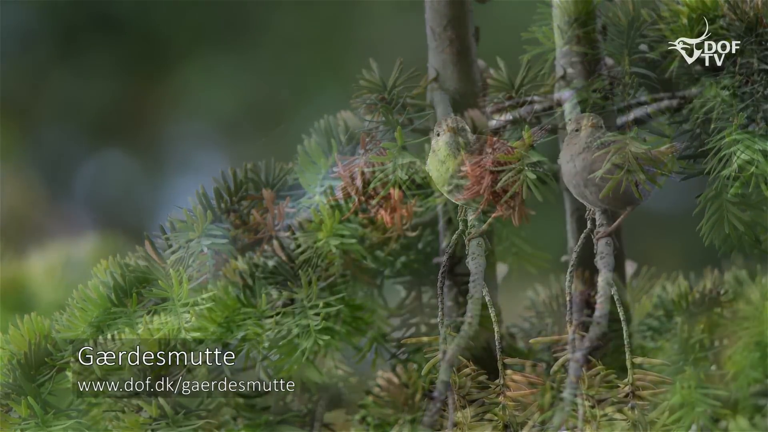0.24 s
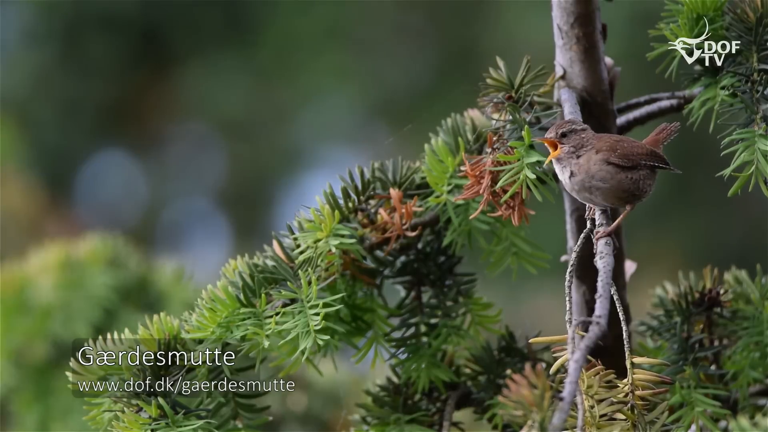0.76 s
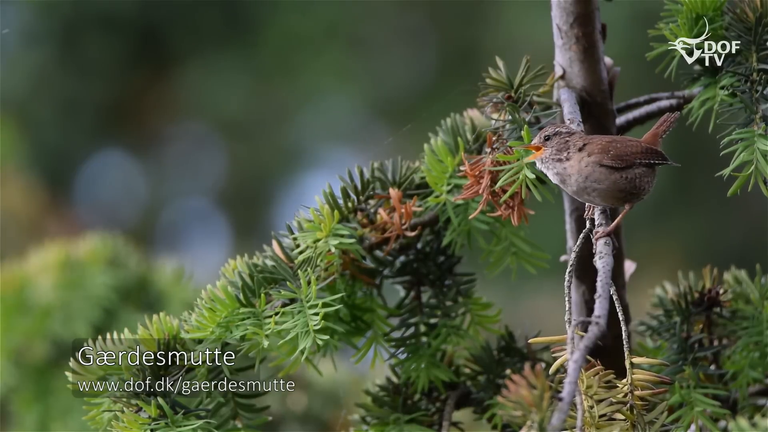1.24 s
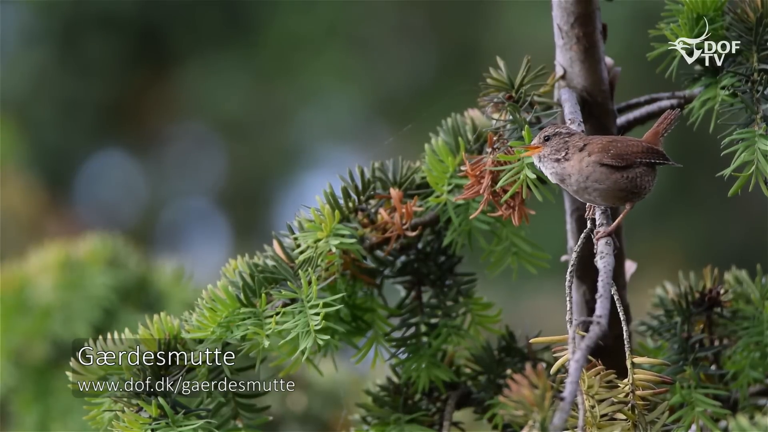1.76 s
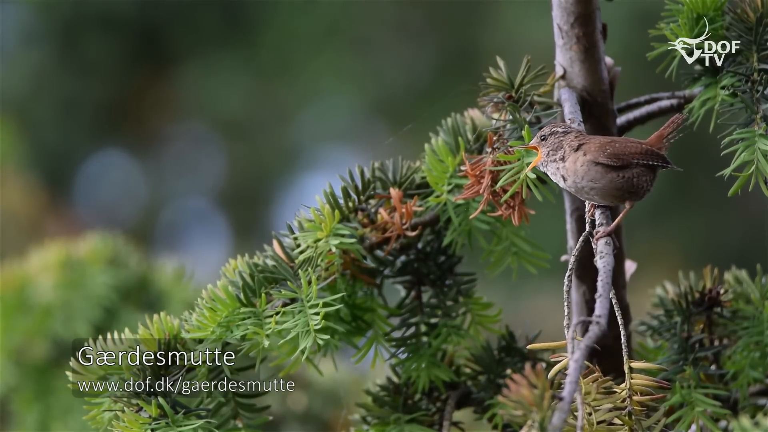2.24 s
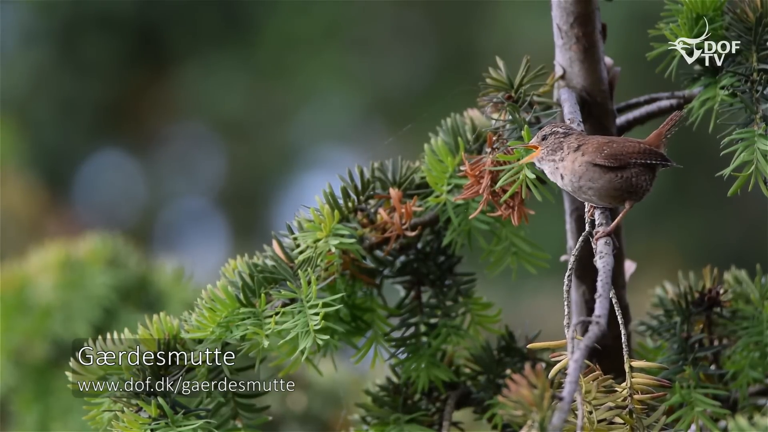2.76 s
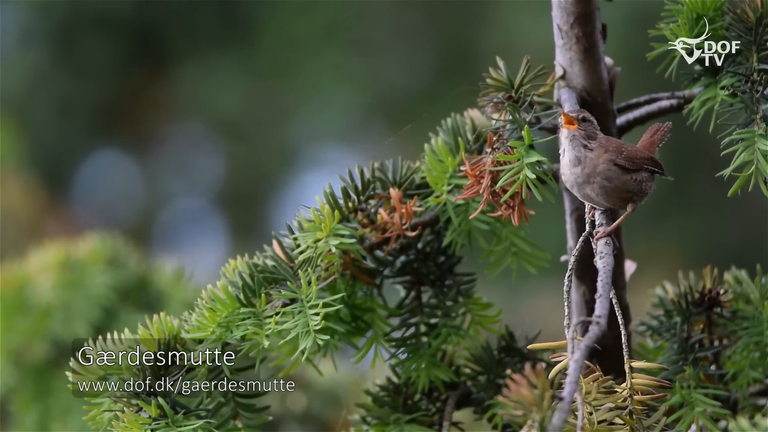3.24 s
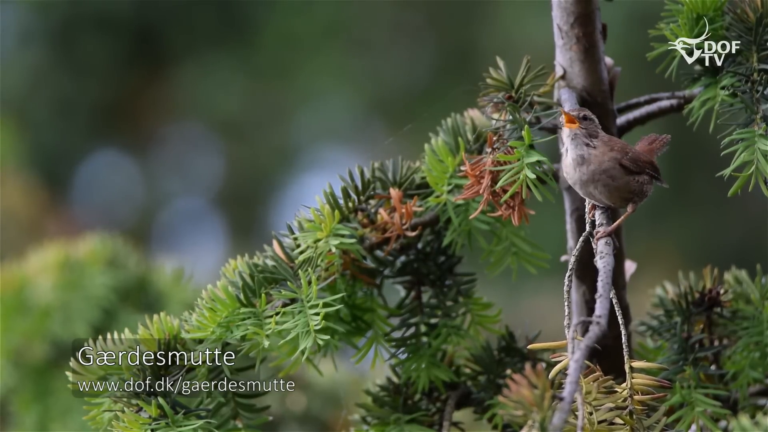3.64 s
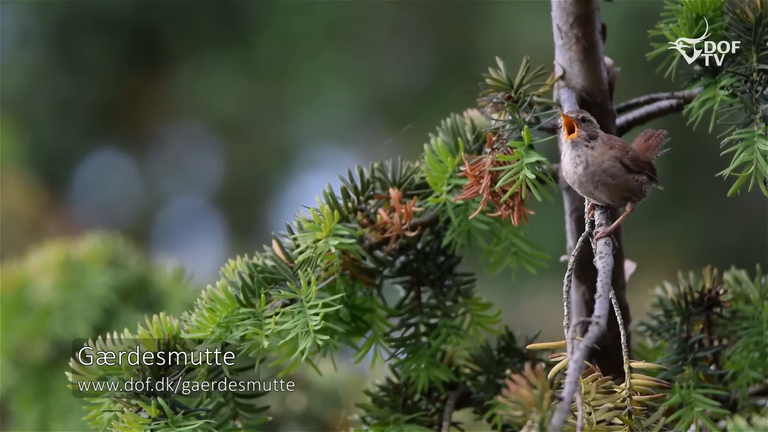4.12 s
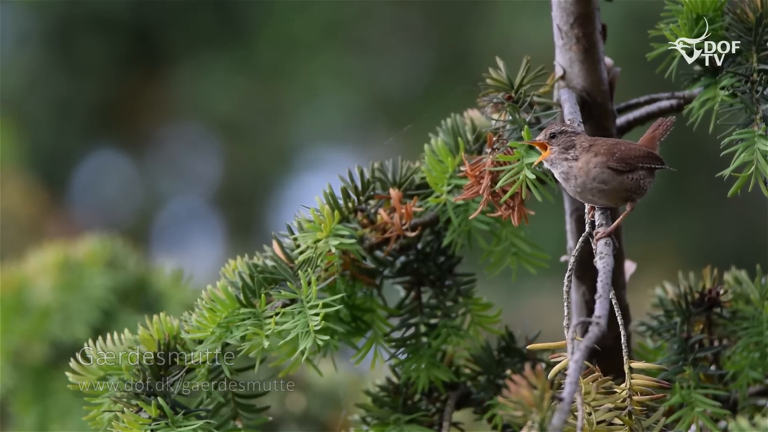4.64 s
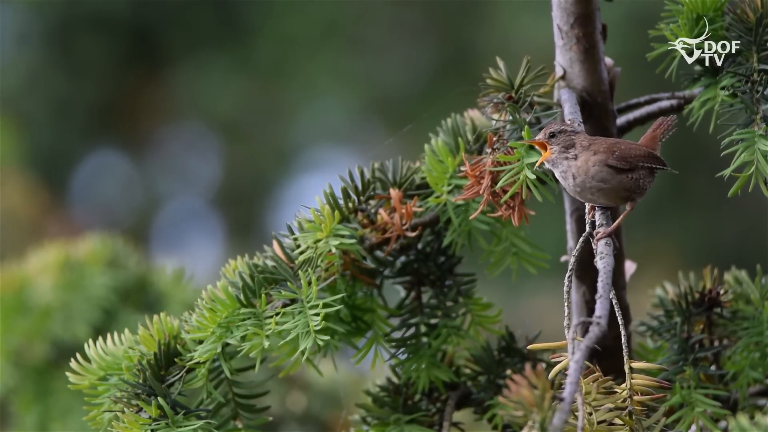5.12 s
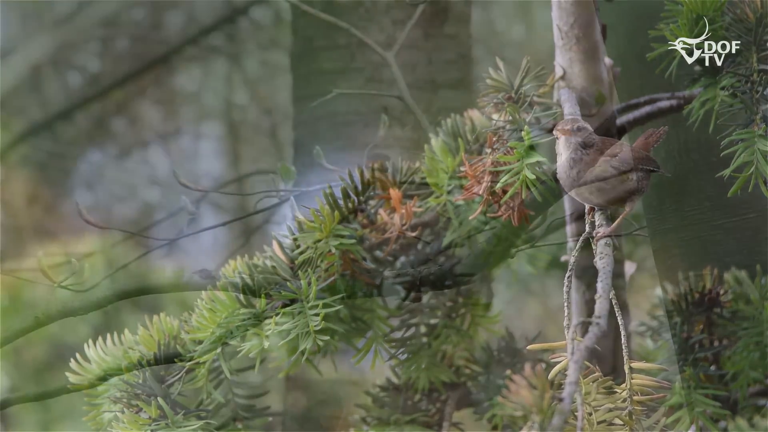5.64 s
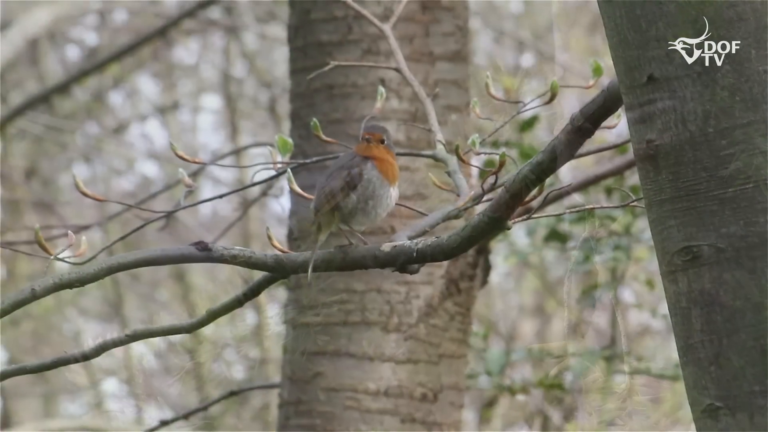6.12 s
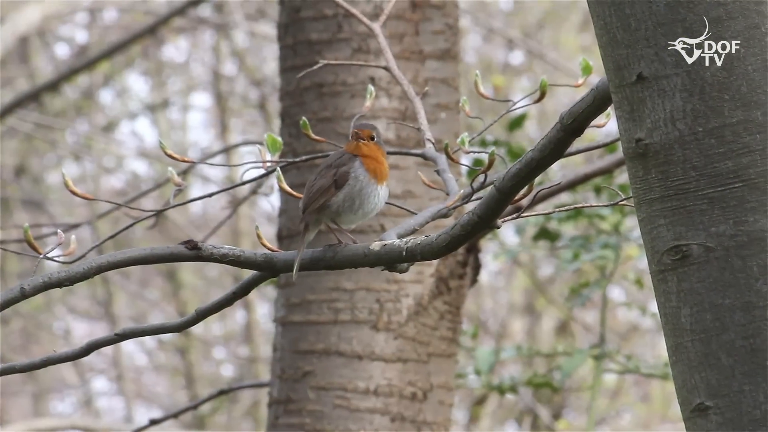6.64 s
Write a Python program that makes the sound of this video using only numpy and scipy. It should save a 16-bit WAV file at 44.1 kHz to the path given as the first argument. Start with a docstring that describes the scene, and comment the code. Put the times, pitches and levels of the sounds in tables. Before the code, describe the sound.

Sharp, echoing wren trills ring out among conifers above steady distant hiss; a crossfade brings low rumble, dry twig-like snaps and piercing robin whistles.

```python
"""Wren song, then a wood with a robin

A wren sings a loud phrase from a conifer over far traffic hiss; its whistles, slides and trills echo off the
trees. The place cross-fades to a wood where a near robin whistles with two voices at once and overloads the
recorder, among twig-like snaps, a low rumble, a bright treble hiss and a thin high whine. A faint note fades
out at the start, and faint birds call far off. Birds are gliding sines, snaps are short rings with noise, and
the backgrounds are coloured noise."""
import sys
import numpy as np
from scipy import signal
from scipy.fft import rfft, irfft, next_fast_len
from scipy.io import wavfile
from scipy.ndimage import uniform_filter1d, map_coordinates

SR = 44100
rng = np.random.default_rng(int(sys.argv[2]) if len(sys.argv) > 2 else 0)


def int16_out(signal):
    """Quantize to a 16-bit WAV file."""
    q = np.round(np.clip(np.atleast_2d(signal).T, -1, 1) * 32767)
    wavfile.write(sys.argv[1], SR, q.astype(np.int16))


N = 303408  # length in samples

# Every note glides to a turning pitch, then slides to its end; it swells to a peak and fades until it is cut.
# Single wren notes: start_s, length_s, first_hz, turn_hz, last_hz, turn_after_s, swell_s, peak_db, fade_db,
# settle (1 is an even slide, more slows down at the end)
WREN_NOTES = [ (0.424, .026, 4500, 5700, 5730, .020, .018, -32, 10, 1),
              (0.498, .036, 6420, 7200, 6480, .014, .030, -26, 4, 2.2),
              (0.577, .062, 4620, 4480, 4430, .012, .036, -19, 1, 1),
              (0.718, .036, 6030, 5010, 4986, .025, .026, -11, 8, 1),
              (0.815, .275, 5400, 7850, 7040, .022, .050, -13, 1.5, 1.2),
              (1.118, .021, 4880, 4750, 3980, .003, .008, -12, 7, 1.5),
              (1.175, .024, 3400, 3530, 3590, .012, .012, -20, 1, 1),
              (1.248, .074, 5300, 5260, 4570, .010, .012, -6, 4, 1.2),
              (1.408, .120, 5030, 4910, 4850, .030, .012, -9, 8, 1),
              (1.540, .057, 3570, 3770, 3430, .028, .046, -16, 0, .7),
              (1.642, .040, 5570, 5300, 3150, .004, .007, -9, 11, 1.6),
              (1.727, .088, 7150, 7350, 4670, .015, .012, -7.5, 7, 1.8),
              (1.848, .023, 3110, 3350, 3210, .008, .008, -27, 0, 1),
              (2.657, .027, 3640, 3820, 3550, .008, .022, -15, 6, 1),
              (2.730, .099, 4670, 4460, 4060, .020, .034, -4.5, 10, .8),
              (2.868, .048, 6730, 8330, 7150, .024, .010, -8, -3, 1.1),
              (3.448, .056, 6170, 6050, 5740, .008, .016, -5.5, 1.5, 1.5),
              (3.502, .106, 5740, 5730, 5680, .010, .004, -14.5, 1.5, 1),
              (3.632, .095, 4880, 4780, 3970, .014, .054, -5.5, 3, .9),
              (4.181, .053, 6560, 7380, 6280, .016, .010, -4, 5, 1.3),
              (4.268, .036, 3194, 3400, 3420, .026, .028, -15, 6, 1),
              (4.356, .195, 8850, 8200, 8070, .022, .012, -8, 1.5, 1.5),
              (4.602, .083, 5400, 5330, 4600, .014, .020, -6, 6, .85), ]
# When each trill syllable is sung: start_s, peak_db
SLUR_TIMES = [(1.913, -8.5), (2.0441, -9), (2.17, -11.5), (2.298, -11.5), (2.42, -9.5), (2.5452, -12.5)]
RISE_TIMES = [(2.963, -4.5), (3.060, -5.5), (3.153, -4.5), (3.246, -5.5), (3.342, -5)]  # its peak_db is for the crest that ends the rise
FALL_TIMES = [(4.745, -7.5), (4.8656, -7.5), (4.98, -8), (5.0984, -7.5), (5.2109, -8.5), (5.3259, -8.5),
              (5.4403, -8.5), (5.5559, -8)]
# Shape of one trill syllable: length_s, first_hz, turn_hz, last_hz, turn_after_s, swell_s, fade_db, settle
SLUR = (.077, 6330, 6420, 6070, .014, .006, 2, 1.6)
FLICK = (.009, 3710, 5300, 5630, .007, .005, 7, 1)
RISE = (.042, 3230, 3400, 3850, .014, .020, -2, 1)
CREST = (.021, 3840, 3880, 4170, .003, .007, 6, 1.1)
FALL = (.054, 6100, 5080, 4780, .034, .005, 0, .8)
TICK = (.006, 7820, 7300, 4560, .001, .001, 0, 1)
PIP = (.008, 5790, 5840, 5750, .004, .002, 5, 1)
# Robin whistles, one row for each voice of each note: columns as for the wren, without settle (even slides)
ROBIN_WHISTLES = [ (6.466, .058, 4820, 6480, 6480, .034, .044, -20, 0),
                  (6.520, .027, 6450, 6400, 6230, .008, .012, -5.5, 11),
                  (6.550, .021, 6350, 6320, 6080, .005, .006, -7, 4),
                  (6.572, .016, 6350, 6300, 6100, .003, .005, -7, 10),
                  (6.615, .127, 5400, 6850, 6800, .024, .100, -1, 0),
                  (6.630, .078, 6510, 6340, 6150, .030, .030, -14, -2),
                  (6.703, .048, 5950, 6080, 5930, .012, .024, -3, 6),
                  (6.806, .100, 6160, 6850, 6760, .016, .060, -2, 0),
                  (6.808, .100, 6250, 6080, 5760, .020, .020, -9, -4), ]
# The robin's low, reedy second voice: columns as for its whistles
ROBIN_REED = [(6.476, .058, 3680, 3830, 3760, .024, .018, -21, 4)]
# Faint notes: columns as for the robin. The first fades out as the scene opens; the rest are birds far off.
FAINT_NOTES = [ (0.0, .14, 5460, 5030, 5200, .06, .005, -45, 8),
               (0.18, .06, 3730, 3650, 3720, .03, .01, -50, 0),
               (0.57, .06, 4100, 3880, 4030, .03, .01, -40, 2),
               (4.43, .13, 5100, 5010, 4820, .06, .02, -45, 0),
               (5.945, .04, 5030, 5150, 5200, .02, .01, -49, 0),
               (6.175, .025, 4220, 3660, 3750, .014, .012, -36, 4),
               (6.22, .03, 3960, 4200, 4000, .012, .006, -39, 1),
               (6.318, .017, 4260, 4270, 4100, .012, .010, -25, 6), ]
# Overtones of each voice: multiple, level_db (the wren's are for a note at 0 dB)
WREN_OVERTONES = [(2, -33.5), (3, -45)]
WHISTLE_OVERTONES = [(2, -34)]
REED_OVERTONES = [(2, -3.5), (3, -12), (4, -27)]
# The wren turns its head: time_s, left_minus_right_db
HEAD_TURNS = [(.4, 1), (1.4, .5), (2, 3), (2.7, 1), (4.2, 2.5), (4.8, -1), (5.55, 0)]
# The loudest dry snaps: start_s, relative_level_db, ring_hz
LOUD_SNAPS = [(1.5222, -15, 2750), (6.2766, -14.5, 3350), (6.3028, -17, 1790), (6.335, -16, 2600),
              (6.3507, -14, 2740), (6.356, -16, 3130), (6.4096, -16, 3900), (6.425, -18.5, 3800),
              (6.4295, -9, 3430), (6.4362, -12, 3500), (6.4582, -16, 2230), (6.4959, -12, 3700),
              (6.6623, -10, 4560), (6.673, -14.5, 3350), (6.6859, -6, 3150), (6.7714, 2.8, 2630),
              (6.7946, -5, 2880), (6.7989, -8, 3300), (6.802, -10, 3020), (6.8067, -1.5, 3550),
              (6.8099, -3, 3660)]
# Tone colour of the snaps: frequency_hz, gain_db
SNAP_COLOUR = [(600, -31.5), (2000, -5), (3500, -1.5), (6000, 0), (10000, -4), (12500, -12), (15000, -25.5),
               (17000, -49)]
# One soft low push: start_s, peak_db, pitch_hz
THUD = (6.2075, -12.5, 315)
# Near echoes off trunks: delay_s, level_db (average of the two sides)
TRUNK_ECHOES = [(.006, -21), (.013, -23), (.022, -29.5), (.027, -22), (.033, -15)]
# How fast the echo cloud dies: frequency_hz, base_time_s to fall by 60 dB
TREE_DECAY = [(3000, 0.27), (5000, .35), (8000, 0.21), (12000, 0.6)]
# Leaves swallow the treble of echoes: frequency_hz, gain_db
LEAF_DULLING = [(3000, 0), (6000, 2), (8300, -1), (10000, -1), (16000, -6.5)]
# Noise colours: frequency_hz, relative_level_db (per Hz)
TRAFFIC_COLOUR = [(70, -55), (120, -23.5), (170, -12.5), (250, -16), (380, -16.5), (520, -7.5), (650, -4.5),
                  (900, -1.5), (1900, -9), (3100, -19), (4500, -25.5), (8000, -38), (12000, -42.5),
                  (14500, -57.5), (17000, -66.5)]
RUMBLE_COLOUR = [(15, -39.5), (30, -22.5), (45, -8), (70, -6.5), (110, -6.5), (160, -11.5), (250, -62.5)]
WOOD_COLOUR = [(30, -31.5), (60, -8.5), (150, -1), (300, -3.5), (600, -9), (1200, -19), (2500, -28.5),
               (4000, -58)]
HISS_COLOUR = [(1000, -36), (2500, -4.5), (5000, 0.5), (8000, -3.5), (10000, -6.5), (12000, -17.5),
               (14500, -19), (17000, -34.5)]
# Stereo width of the noises: frequency_hz, side_minus_mid_db
NOISE_WIDTH = [(60, -24.5), (100, -22.5), (180, -26), (310, -30.5), (520, -28), (900, -21), (1550, -15.5),
               (2670, -11), (4590, -10), (7890, -5)]
# Loudness of each noise over time: time_s, level_db
TRAFFIC_LEVEL = [(0, -26.3), (1.5, -26), (3.5, -28.3), (5, -26.5), (6.1, -26.5), (6.88, -33.5)]
RUMBLE_LEVEL = [(0, -52), (.9, -50), (4, -54), (5, -49.5), (5.8, -51.5), (6.4, -38), (6.88, -35)]
WOOD_LEVEL = [(0, -72.5), (4, -45), (4.7, -41.5), (5.9, -39), (6.4, -32.5), (6.88, -29.5)]
HISS_LEVEL = [(5.7, -76), (6, -48), (6.45, -44.5), (6.6, -42), (6.7, -29), (6.88, -33)]
# The recorder's slow shift away from zero: time_s, value
OFFSET = [(0, -.024), (1, -.0165), (6, -.0165), (6.88, 0)]

ONSET_DB, EASE = -19, 1.8  # a note starts this far under its peak; glide and swell slow down towards their goal
RELEASE_DB, RELEASE_SHARE = 4, .12  # every note dies away over the last part of its length
FLICK_LEAD_S, FLICK_DB = .021, -5  # a flick comes just before each slur, softer
PIP_LEAD_S, PIP_DB = .015, -9  # a pip links each fall to the next
RISE_DB = -11  # a rise is soft until it ends in a loud crest
RATTLE_START_S, TICK_GAP_S, TICK_COUNT, TICK_DB = 3.7595, .02925, 14, -14  # an evenly spaced rattle
SMALL_SNAP_COUNT, SMALL_SNAP_DB, SMALL_SNAP_HZ = 12, -23, 2600  # faint snaps; level and ring scatter around these
FADE_START_S, FADE_END_S = 5.75, 6.88  # the cross-fade from the first place to the wood
WHINE_HZ, WHINE_DB = 15703, -37.5  # this level is reached by the end of the fade
BAND_HZ, TOP_HZ = 15850, 20000  # treble limits before and after the flat cut


def amp(db):
    """Turn decibels into a gain."""
    return 10 ** (np.asarray(db) / 20)


def unit(x):
    """Scale x to an average strength (rms) of 1."""
    return x / np.sqrt(np.mean(x ** 2) + 1e-20)


def along(points, hz):
    """Read a value at each frequency from (Hz, value) points on a log axis."""
    point_hz, values = np.transpose(points)
    return np.interp(np.log(hz + 1), np.log(point_hz + 1), values)


def curve(rows):
    """Join (seconds, value) points into one value per sample."""
    return np.interp(np.arange(N) / SR, *np.transpose(rows))


def wobble(rate, size=N):
    """Make a smooth random curve with this many random points a second."""
    knots = rng.standard_normal(int(size * rate / SR) + 4)
    return map_coordinates(knots, [np.arange(size) * rate / SR])


def filtered(x, response):
    """Shape x with a gain that depends on frequency."""
    padded_size = next_fast_len(N + 8192)
    gain = response(np.fft.rfftfreq(padded_size, 1 / SR))
    return irfft(rfft(x, padded_size) * gain, padded_size)[..., :N]


def rush(colour, patchy_db):
    """Stereo noise of rms 1, with smooth patches of random gain in time and frequency."""
    z = signal.stft(rng.standard_normal((2, N + 512)), nperseg=512)[2]
    patches = uniform_filter1d(rng.standard_normal(z.shape[1:]), 6, 0)
    patches = uniform_filter1d(patches, 14, 1)
    pair = signal.istft(z * amp(patchy_db * unit(patches)), nperseg=512)[1][:, :N]
    # the first channel becomes the middle, the second the difference between the sides
    mid, side = filtered(pair, lambda hz: amp(along(colour, hz) + [0 * hz, along(NOISE_WIDTH, hz)]))
    return unit(np.array([mid + side, mid - side]))


def phrase(start, length, first_hz, turn_hz, last_hz, turn, swell, peak_db, fade_db, settle=1):
    """Turn one note row into points of time (s), pitch (Hz) and level (dB)."""
    t = np.linspace(0, length, num=32)

    def before(goal):
        """Falls from 1 to 0 on the way to the goal, slowing down."""
        return np.clip(1 - t / goal, 0, 1) ** EASE

    def past(goal):
        """Climbs evenly from 0 at the goal to 1 at the end of the note."""
        return np.clip((t - goal) / max(length - goal, 1e-4), 0, 1)

    last_slide = 1 - (1 - past(turn)) ** settle
    hz = turn_hz + (first_hz - turn_hz) * before(turn) + (last_hz - turn_hz) * last_slide
    db = peak_db + ONSET_DB * before(swell) - fade_db * past(swell)
    db = db - RELEASE_DB * past(length * (1 - RELEASE_SHARE))
    return start + t, hz, db


def sing(notes, overtones, waver, flutter_db, edge, effort=0):
    """Each note is a gliding sine with any listed overtones, slightly unsteady, with soft ends of edge seconds."""
    out = np.zeros(N + SR)
    for note in notes:
        s, hz, db = phrase(*note)
        first = round(s[0] * SR)
        t = np.arange(first, round(s[-1] * SR)) / SR
        level_db = np.interp(t, s, db)
        glide = uniform_filter1d(np.interp(t, s, hz), size=65, mode="nearest")  # muscles round the corners
        unsteady_hz = glide * (1 + waver * wobble(150, len(t)))
        phase = 2 * np.pi * np.cumsum(unsteady_hz) / SR
        tone = np.sin(phase)
        for multiple, overtone_db in overtones:
            # with effort above 0, louder notes are richer
            tone = tone + amp(overtone_db + effort * level_db) * np.sin(multiple * phase)
        ends = np.clip(np.minimum(t - s[0], s[-1] - t) / edge, 0, 1)
        loudness = amp(level_db + flutter_db * wobble(120.3, len(t)))
        out[first:first + len(t)] += tone * ends * loudness
    return out[:N]


def echoes(x, cloud_db, side_db, longer, size=16384):
    """Random echoes from the trees, each frequency dying at its own speed; a little differs between the sides.
    The bird keeps moving, so every stretch of sound meets a new cloud."""
    out = np.zeros((2, N + size + 2 * SR))
    fade = np.hanning(size + 1)[:size]  # overlapping stretches blend smoothly
    padded = np.pad(x, (size // 2, size))
    for first in range(0, N + size // 2, size // 2):
        piece = padded[first:first + size] * fade
        if np.abs(piece).max() < 1e-4:  # too quiet to echo
            continue
        hz, t, z = signal.stft(rng.standard_normal((2, SR)), SR, nperseg=256)
        decay_s = longer * along(TREE_DECAY, hz)[:, None]
        tail = signal.istft(z * amp(-60 * t / decay_s), SR, nperseg=256)[1]
        wet = signal.fftconvolve(piece[None], tail / np.linalg.norm(tail[0]), axes=1)
        out[:, first:first + wet.shape[1]] += wet
    mid, side = out[:, size // 2:size // 2 + N]
    side = amp(side_db) * side
    return amp(cloud_db) * np.array([mid + side, mid - side])


def traffic():
    """Far traffic is a broad hiss whose level drifts gently."""
    level = amp(curve(TRAFFIC_LEVEL) + 0.33 * wobble(2.7))
    return level * rush(TRAFFIC_COLOUR, patchy_db=0.54)


def rumble():
    """The rumble is very low noise that swells in the wood."""
    return amp(curve(RUMBLE_LEVEL)) * rush(RUMBLE_COLOUR, patchy_db=1.1)


def wood_roar():
    """The low roar of the wood is dark noise that grows and wavers."""
    level = amp(curve(WOOD_LEVEL) + .6 * wobble(8))
    return level * rush(WOOD_COLOUR, patchy_db=0.4)


def treble_hiss():
    """A bright treble hiss whose fast level changes make short crackling bursts; it flares near 6.7 s."""
    crackle_db = 3 * wobble(200)
    return amp(curve(HISS_LEVEL) + crackle_db) * rush(HISS_COLOUR, patchy_db=2.5)


def electric_whine():
    """The electric whine is one high sine at a steady pitch, rising in level through the cross-fade."""
    fade = curve([(FADE_START_S, 0), (FADE_END_S, 1)])
    return fade ** 1.8 * amp(WHINE_DB) * np.sin(2 * np.pi * WHINE_HZ * np.arange(N) / SR)


def background():
    """Far traffic gives way to the roar, rumble, hiss and whine of the wood."""
    return traffic() + rumble() + wood_roar() + treble_hiss() + electric_whine()


def faint_notes():
    """Faint notes are thin unsteady sines with their echoes."""
    notes = sing(FAINT_NOTES, [], waver=0.0072, flutter_db=-1.0, edge=.004)
    return notes + echoes(notes, cloud_db=-6, side_db=-12, longer=.6)


def trill_notes():
    """Repeat the wren's syllables, each a little off in length, pitch, bend and level."""
    flicks = [(s - FLICK_LEAD_S, db + FLICK_DB) for s, db in SLUR_TIMES]
    pips = [(s - PIP_LEAD_S, db + PIP_DB) for s, db in FALL_TIMES[1:]]
    rises = [(s, db + RISE_DB) for s, db in RISE_TIMES]
    crests = [(s + RISE[0] - .003, db) for s, db in RISE_TIMES]
    ticks = [(RATTLE_START_S + k * TICK_GAP_S, TICK_DB) for k in range(TICK_COUNT)]
    trills = [(SLUR, SLUR_TIMES), (FLICK, flicks), (RISE, rises), (CREST, crests),
              (FALL, FALL_TIMES), (TICK, ticks), (PIP, pips)]
    repeats = []
    for (length, *hz, turn, swell, fade_db, settle), times in trills:
        for s, db in times:
            variation = rng.standard_normal(4) * [.03, .0048, .08, .8]
            longer, higher, later, louder_db = [1, 1, 1, 0] + variation
            repeats.append((s, length * longer, *np.multiply(hz, higher), turn * later,
                            swell * longer, db + louder_db, fade_db, settle))
    return repeats


def trunk_echoes(dull):
    """Near trunks answer with single delayed copies, louder on alternate sides."""
    out = np.zeros((2, N))
    for k, (delay, db) in enumerate(TRUNK_ECHOES):
        delayed = np.pad(dull, (round(delay * SR), 0))[:N]
        lean = amp(2.1 * (-1) ** k * np.array([[1], [-1]]))
        out += amp(db) * delayed * lean
    return out


def wren():
    """The wren's gliding whistles and trills reach us directly, off near trunks and through two echo clouds."""
    notes = list(WREN_NOTES) + trill_notes()
    song = sing(notes, WREN_OVERTONES, waver=0.0018, flutter_db=0.98, edge=0.0019, effort=0.28)
    dull = filtered(song, lambda hz: amp(along(LEAF_DULLING, hz)))
    direct = song * amp(curve(HEAD_TURNS) * [[.5], [-.5]])
    short_cloud = echoes(dull, cloud_db=-3.5, side_db=-9, longer=1.0)
    long_cloud = echoes(dull, cloud_db=-16.5, side_db=-8.5, longer=3.3)
    return direct + trunk_echoes(dull) + short_cloud + long_cloud


def snaps():
    """Each twig-like snap is a few cycles of dying ring and a spit of noise."""
    out = np.zeros(N + SR)
    t = np.arange(SR // 50) / SR
    spread = [FADE_END_S - 6.05, 6.5, SMALL_SNAP_HZ]
    lowest = [6.05, SMALL_SNAP_DB - 3.5, SMALL_SNAP_HZ / 2]
    small = rng.random((SMALL_SNAP_COUNT, 3)) * spread + lowest  # same columns as the loud ones
    for s, db, hz in [*LOUD_SNAPS, *small]:
        ring = amp(-60 * t / 0.0028) * np.sin(2 * np.pi * hz * t)
        spit = 0.9 * amp(-60 * t / 0.0012) * rng.standard_normal(len(t))
        out[round(s * SR):][:len(t)] += amp(db + 5.0) * (ring + spit)
    return filtered(out[:N], lambda hz: amp(along(SNAP_COLOUR, hz)))


def thud():
    """The thud is about one soft low cycle under a bell-shaped swell."""
    s, db, hz = THUD
    cycles = (np.arange(N) / SR - s - .001) * hz
    return -amp(db) * np.cos(2 * np.pi * cycles) * np.exp(-2.5 * cycles ** 2)


def robin():
    """Two voices beat against each other; sharing one windpipe, they also make sum and difference tones."""
    whistle = sing(ROBIN_WHISTLES, WHISTLE_OVERTONES, waver=.006, flutter_db=2.6, edge=.002)
    reed = sing(ROBIN_REED, REED_OVERTONES, waver=.002, flutter_db=3.0, edge=.002)
    whistle_mixing = filtered(.02 * whistle ** 2, lambda hz: hz > 9000)  # the throat passes only the high products
    mixing = 1.5 * whistle * reed + whistle_mixing
    return whistle + reed + mixing


def close_sounds():
    """Snaps, thud and robin are close and dry, with a weak, nearly central echo cloud."""
    near = snaps() + thud() + robin()
    return near + echoes(near, cloud_db=-12, side_db=-51, longer=1.0)


def scene():
    """Add up all birds, close sounds and backgrounds."""
    return background() + faint_notes() + wren() + close_sounds()


def record(dry):
    """The preamplifier rounds off overloads before the band limit.
    What still passes full scale is cut flat and spills above the band."""
    rounded = dry / (1 + np.abs(dry / 1.04) ** 10) ** (1 / 10)
    shifted = filtered(rounded, lambda hz: hz < BAND_HZ) + curve(OFFSET)
    return filtered(np.clip(shifted, -1, 1), lambda hz: hz < TOP_HZ)


dry = scene()
out = record(dry)
int16_out(out)
```